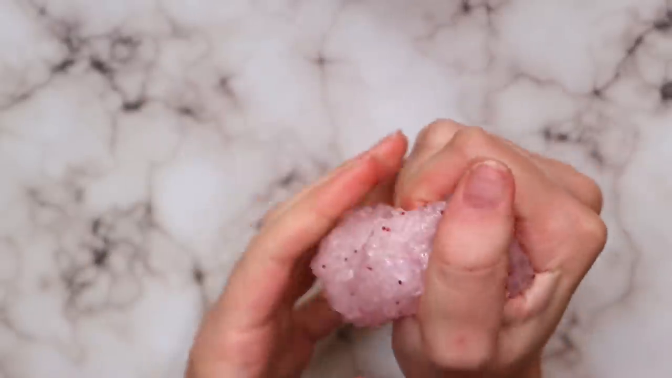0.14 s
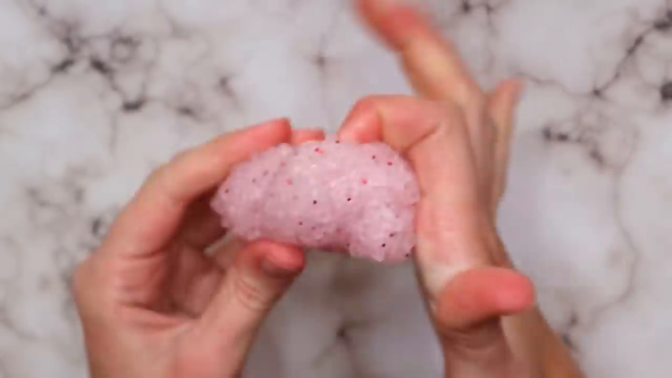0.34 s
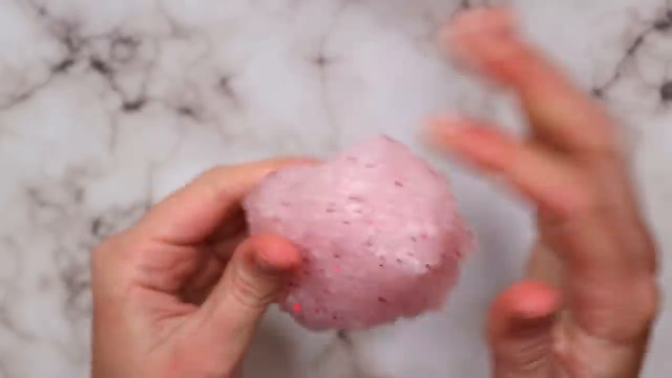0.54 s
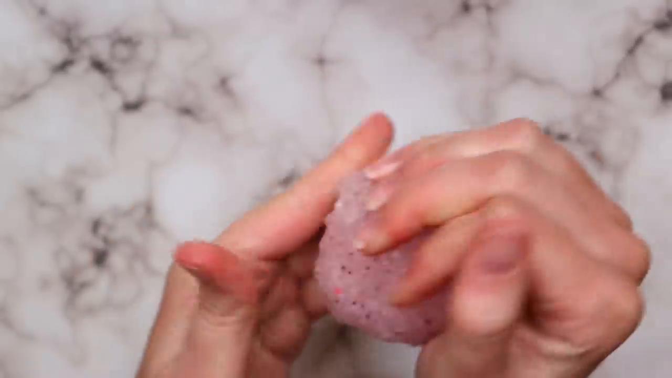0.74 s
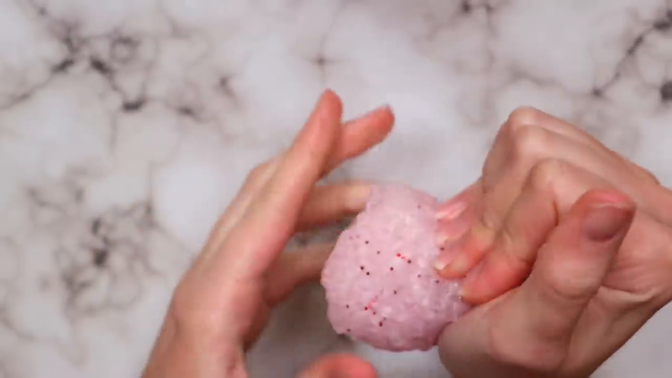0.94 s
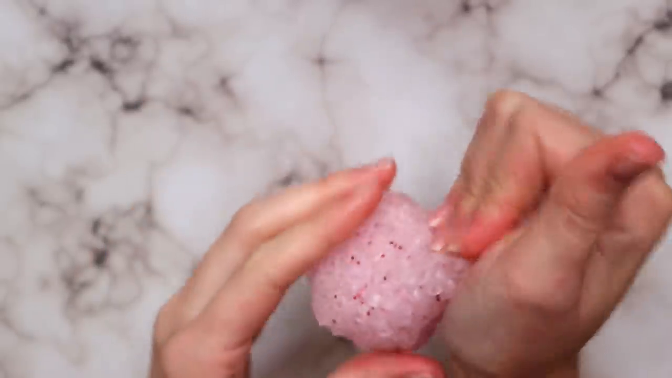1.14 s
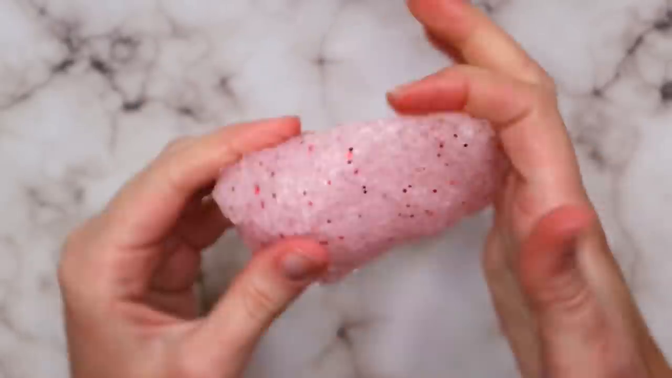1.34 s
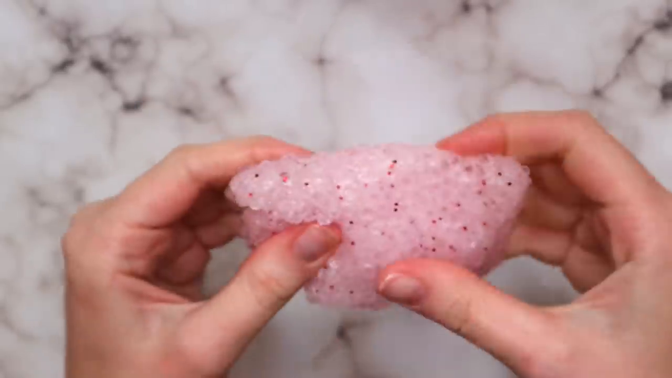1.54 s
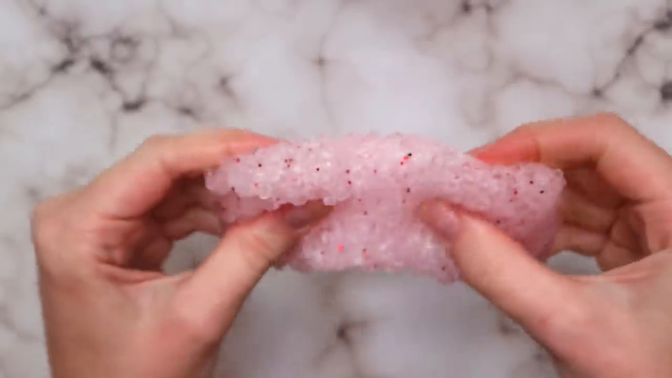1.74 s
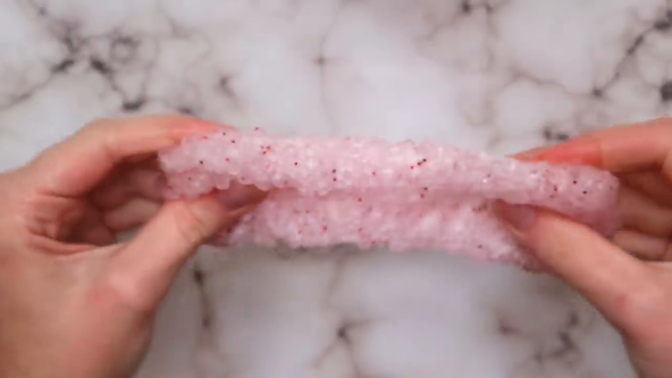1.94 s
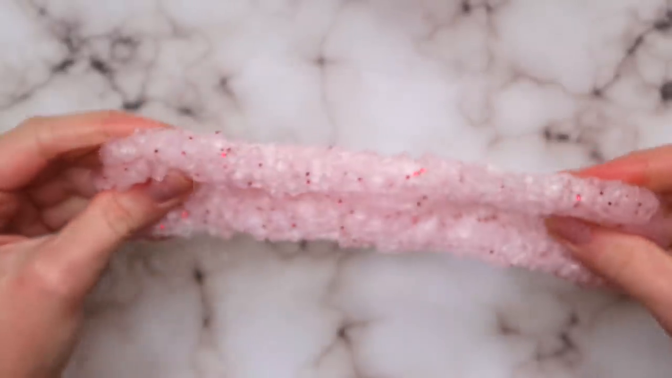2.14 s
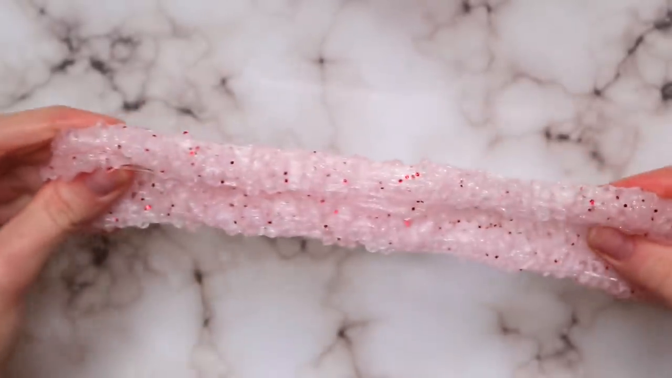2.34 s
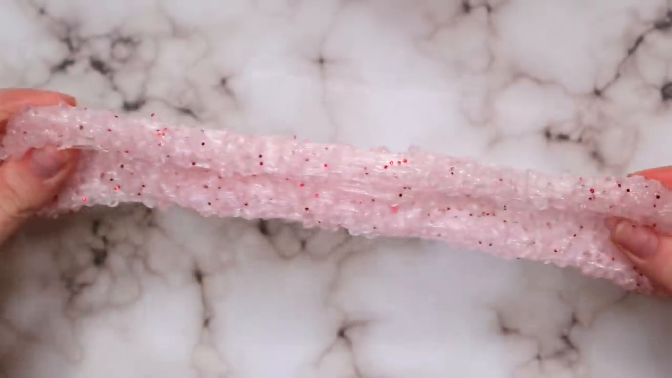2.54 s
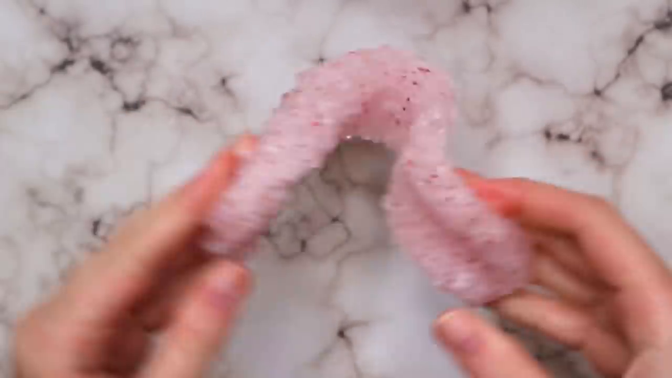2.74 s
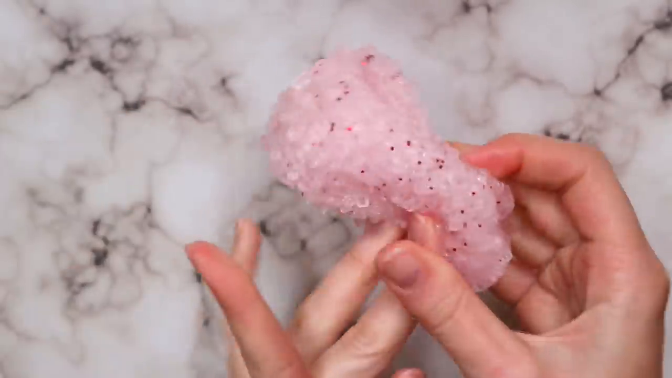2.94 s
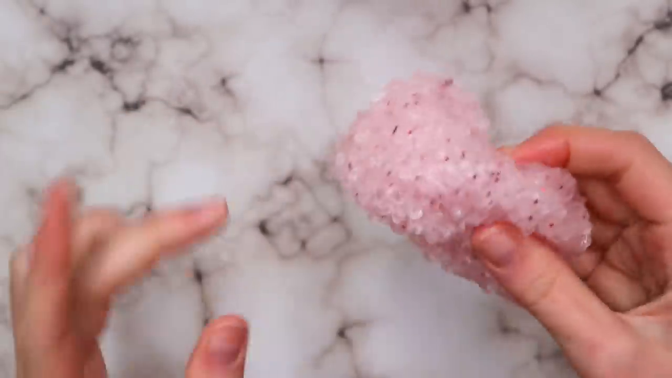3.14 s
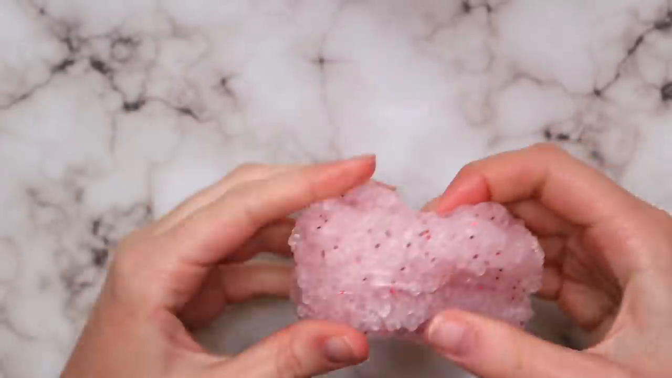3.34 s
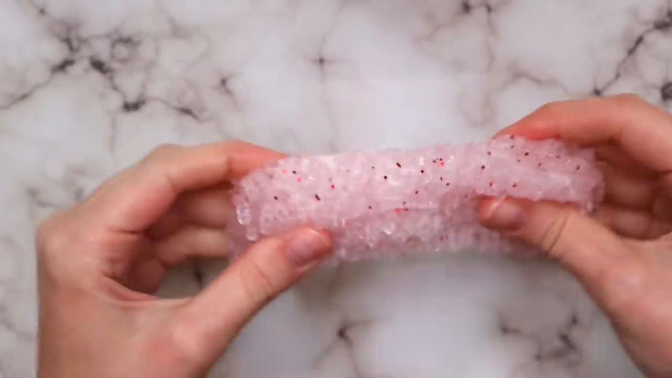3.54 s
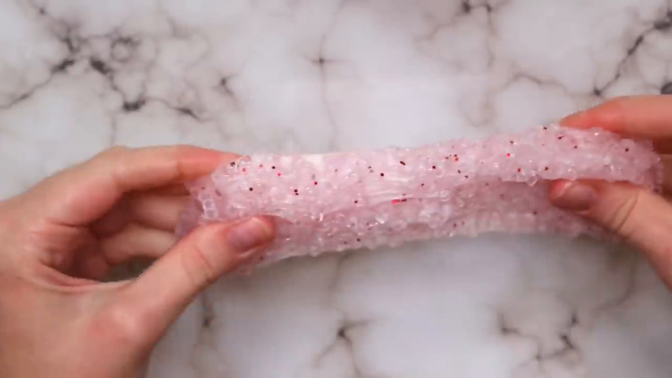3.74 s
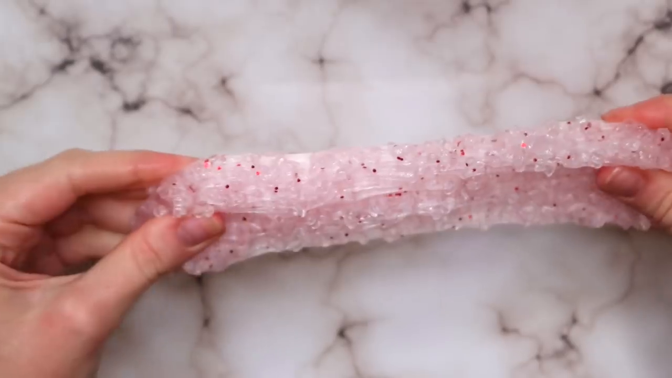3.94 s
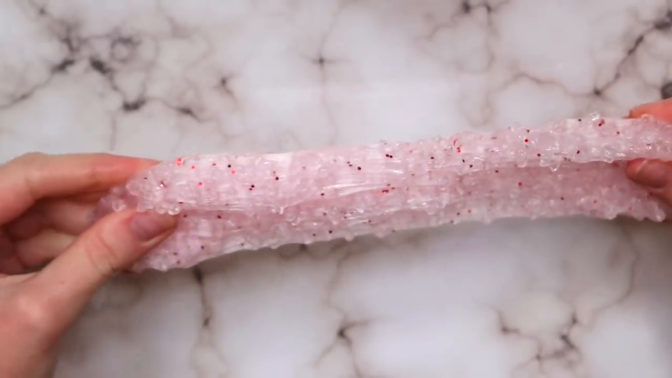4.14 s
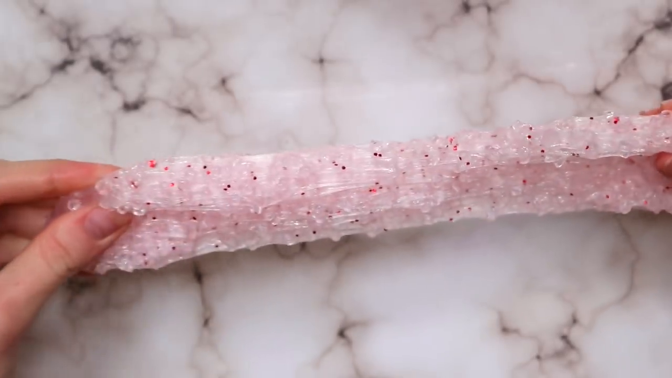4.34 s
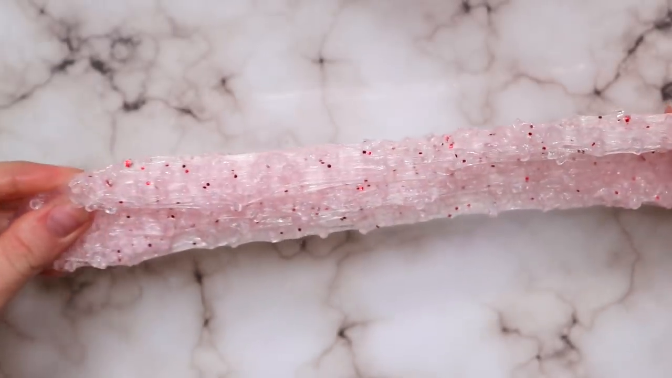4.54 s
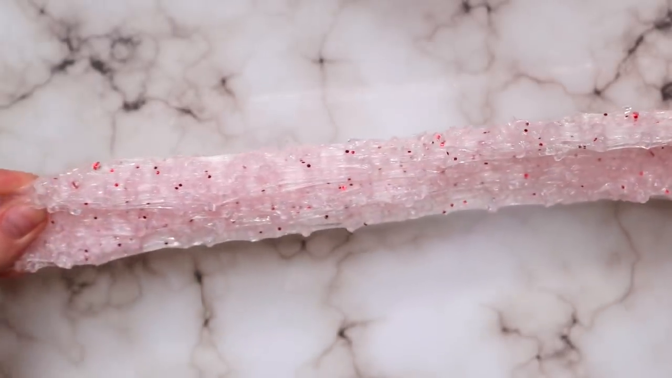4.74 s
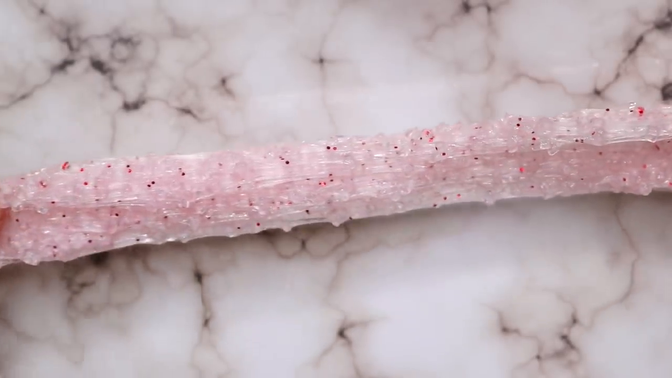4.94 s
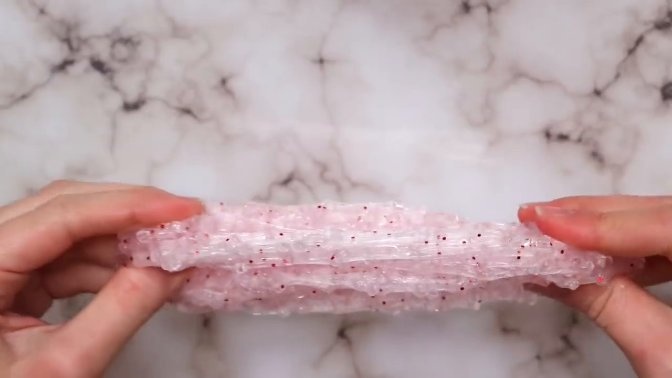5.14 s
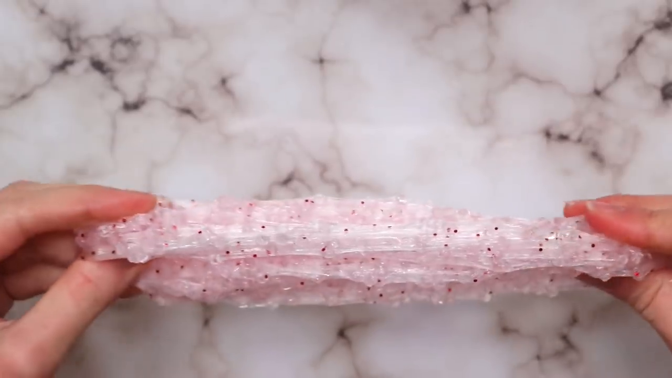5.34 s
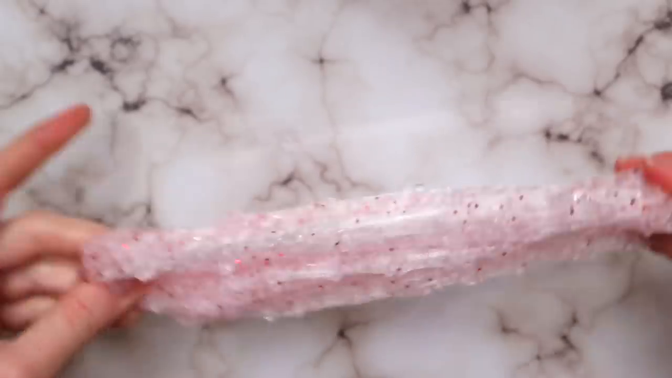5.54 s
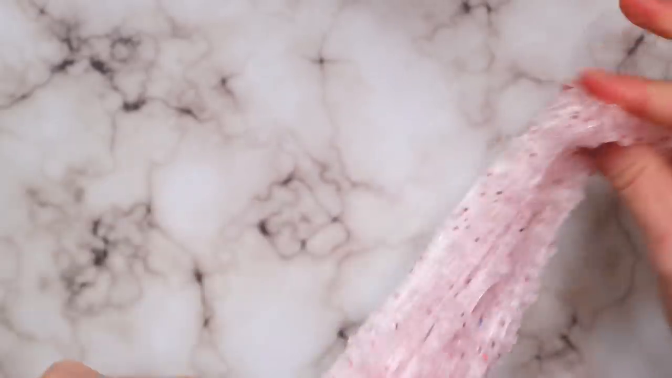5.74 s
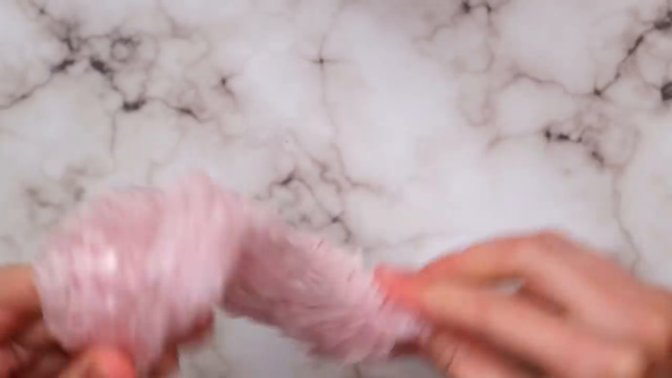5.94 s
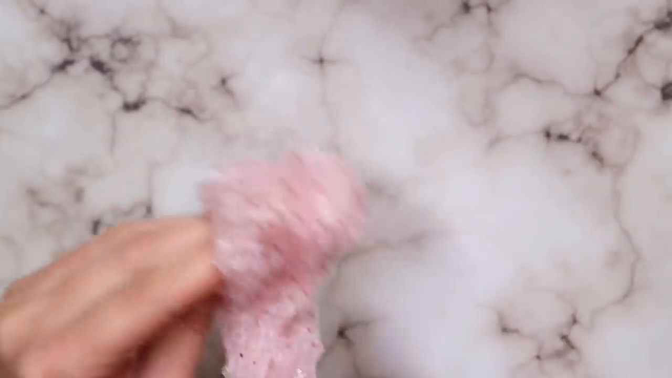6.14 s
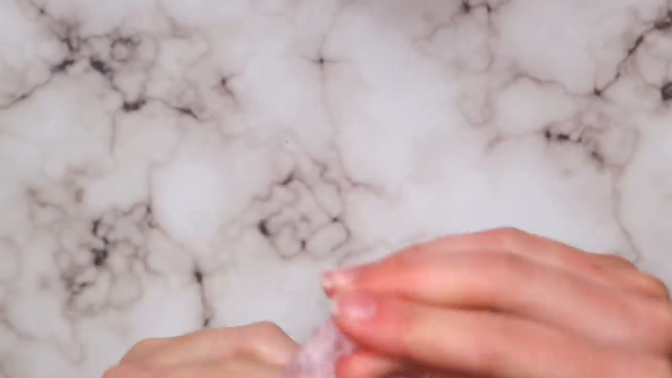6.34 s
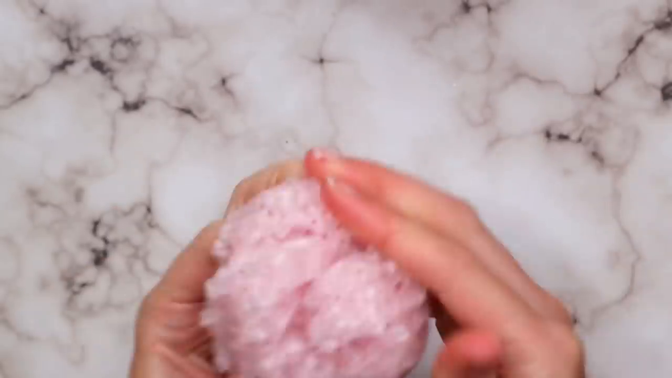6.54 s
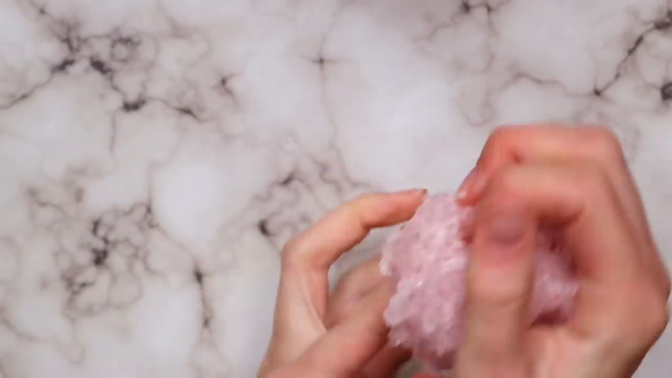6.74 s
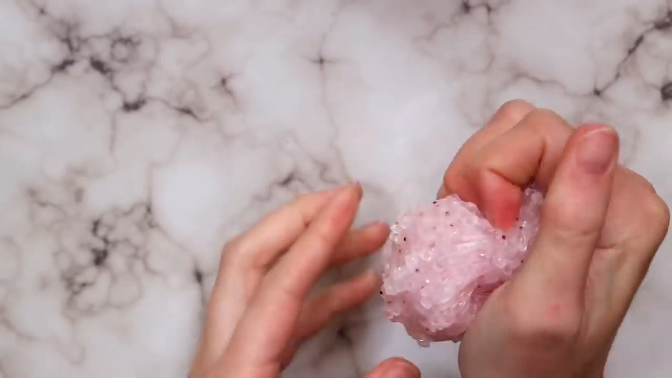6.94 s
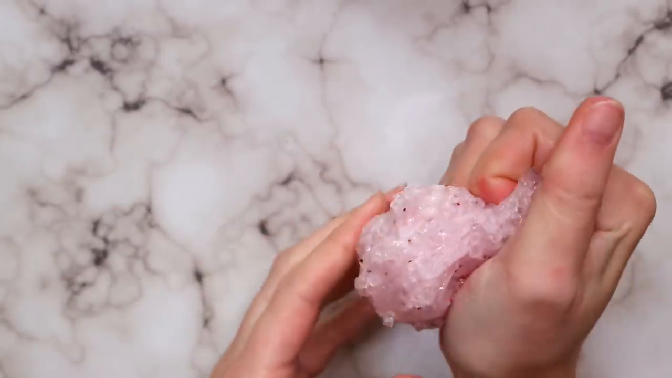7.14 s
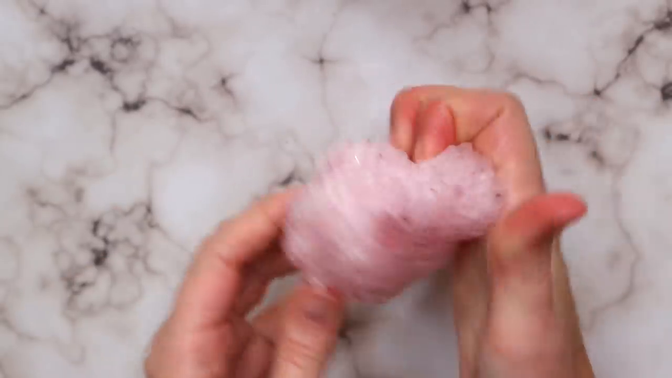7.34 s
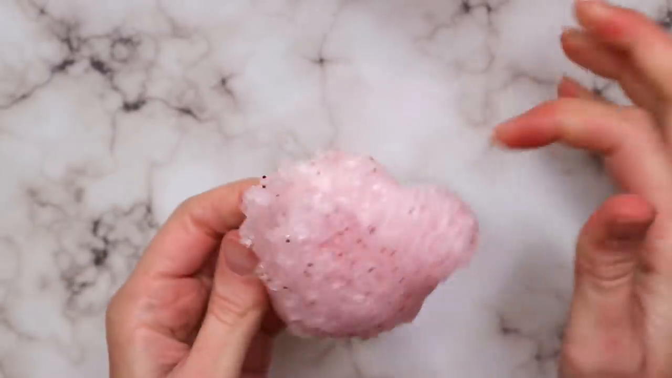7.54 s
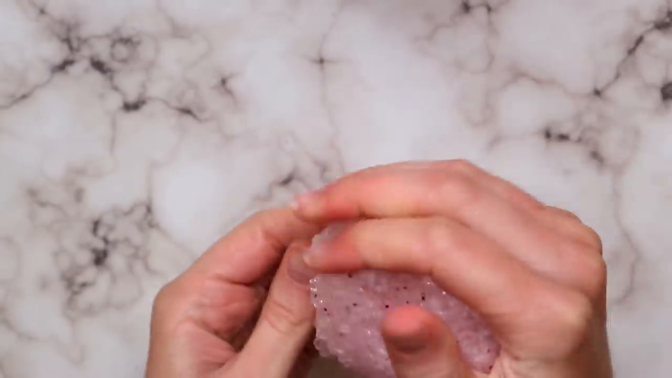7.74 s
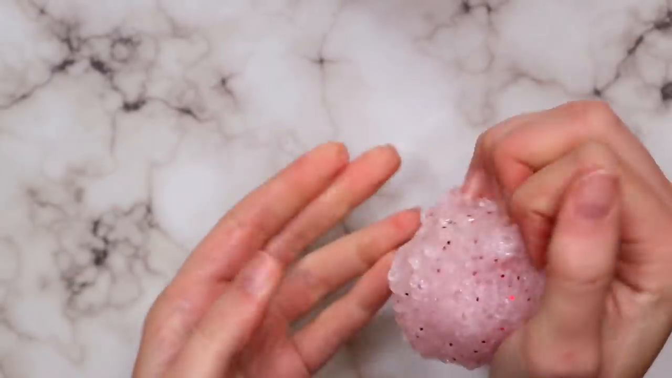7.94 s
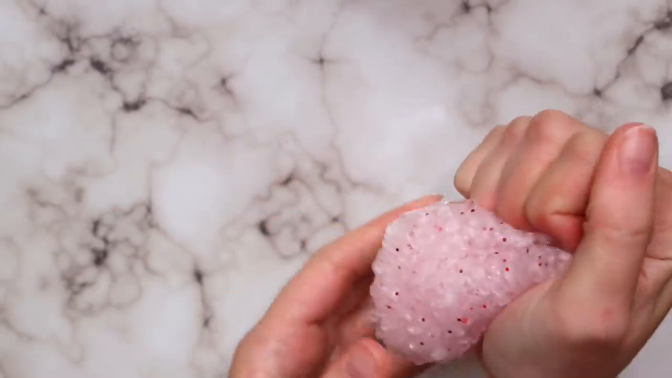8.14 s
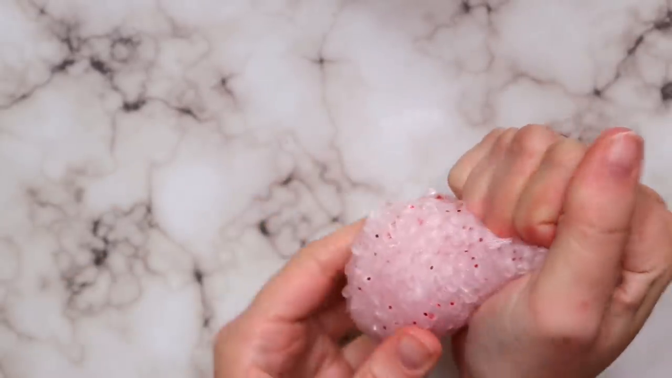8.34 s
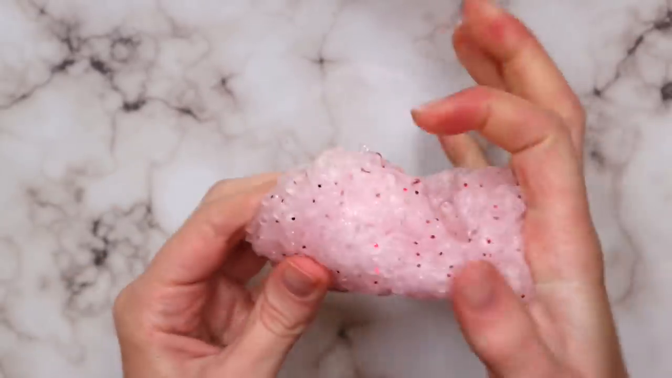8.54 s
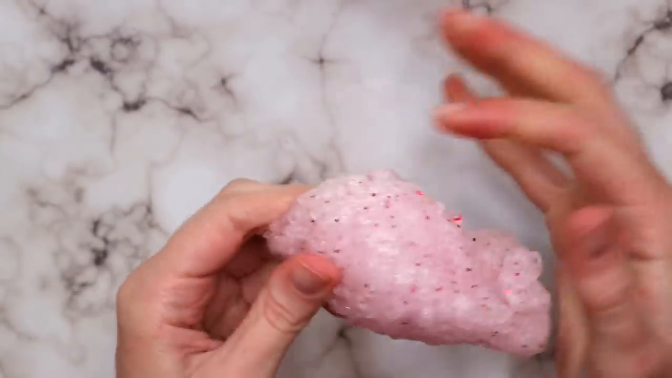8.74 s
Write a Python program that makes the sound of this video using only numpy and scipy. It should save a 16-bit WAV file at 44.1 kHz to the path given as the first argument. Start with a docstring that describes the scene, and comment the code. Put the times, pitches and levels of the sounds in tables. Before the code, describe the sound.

Fingers squeeze and poke beaded slime up close, with sharp bright pops and wet crackle, then stretches that fizz softly over a faint room hum.

```python
"""Bubbles pop in a lump of beaded slime kneaded close to a stereo microphone: damped cavity rings, snaps and thuds.
Fingers squelch in and peel out as swells of dense crackle, and the stretched strand fizzes with tiny bursts.
Under it lie a faint room tone of coloured noise with hum partials and, for a while,
a low drone like an engine outside, made of a few harmonics and rumble."""
import sys
import numpy as np
from scipy import signal
from scipy.fft import rfft, irfft, next_fast_len
from scipy.io import wavfile
from scipy.ndimage import uniform_filter1d, minimum_filter1d, map_coordinates

SR = 44100
rng = np.random.default_rng(int(sys.argv[2]) if len(sys.argv) > 2 else 0)


def unload_wav(signal):
    """Save mono or channel-first audio to the path in sys.argv[1] as 16-bit WAV at rate SR, clipped to [-1, 1]."""
    wavfile.write(
        sys.argv[1],
        SR,
        np.round(np.clip(np.atleast_2d(signal).T, -1, 1) * 32767).astype(np.int16),
    )


N = 392049


def amp(db):
    """Decibels to gain."""
    return 10 ** (np.asarray(db) / 20)


def unit(x):
    """Scaled to rms 1."""
    return x / np.sqrt(np.mean(x ** 2) + 1e-20)


def unit_energy(x):
    """Scaled to energy 1 in each channel."""
    return x / np.sqrt(np.sum(x ** 2, axis=-1, keepdims=True) + 1e-20)


def along(points, hz):
    """(Hz, value) points read on a log frequency axis."""
    point_hz, value = np.transpose(points)
    return np.interp(np.log(hz + 1), np.log(point_hz + 1), value)


def wobble(rate):
    """A smooth random curve, rate knots a second."""
    knots = rng.standard_normal(int(N * rate / SR) + 4)
    return map_coordinates(knots, [np.arange(N) * rate / SR])


def impulse(spectrum, size=1024):
    """Minimum-phase click: the most compact causal burst with this spectrum, energy 1."""
    cepstrum = irfft(np.log(amp(along(spectrum, np.fft.rfftfreq(size, 1 / SR)))))
    # folding the cepstrum forward in time makes the click causal
    cepstrum[1:size // 2] *= 2
    cepstrum[size // 2 + 1:] = 0
    return unit_energy(irfft(np.exp(rfft(cepstrum))))


def convolve(x, response):
    """Convolution along time; mono spreads to both channels."""
    return signal.fftconvolve(np.atleast_2d(x), np.atleast_2d(response), axes=1)


def noise(spectrum, side_db):
    """Coloured stereo noise of rms 1; side_db sets its width."""
    m = next_fast_len(N)
    gain = amp(along(spectrum, np.fft.rfftfreq(m, 1 / SR)))
    mid, side = irfft(rfft(rng.standard_normal((2, m))) * gain, m)[:, :N]
    side = amp(side_db) * side
    return unit(np.array([mid + side, mid - side]))


# how long the room rings at each frequency: pitch_hz [Hz], t60_s [s]
ROOM_DECAY = [(200, 0.35), (800, 0.36), (2500, 0.31), (7000, 0.36), (15000, 0.22)]


def room_tail(size=SR // 4):
    """The room's answer to a click, energy 1; each frequency dies at its own speed."""
    hz, frame_s, grains = signal.stft(rng.standard_normal((2, size)), SR, nperseg=256)
    decay = amp(-60 * frame_s / along(ROOM_DECAY, hz)[:, None])
    tail = signal.istft(grains * decay, SR, nperseg=256)[1][:, :size]
    return unit_energy(tail * (np.arange(size) > .006 * SR))


# echo of the table top just under the hands: nominal delay, and the random spread given to every echo delay
TABLE_ECHO_S, ECHO_SPREAD = .00093, 0.036  # seconds, fraction of the delay
# echoes of nearby walls: delay_s [s, nominal], level_db [dB re direct sound]
WALL_ECHOES = [(.0082, -16.5), (0.0137, -20.5), (0.0206, -19)]


def surroundings(near_db, room_db, near_t60=0.027, apart=1.0, table_db=-8):
    """Path to the microphones: direct sound, scatter off the hands, table and wall echoes, then the room's tail."""
    size = SR // 4
    t = np.arange(size) / SR
    scatter = rng.standard_normal((2, size)) * amp(-60 * t / near_t60) * (t > .0002)
    near = amp(near_db) * unit_energy(scatter) * [[1], [apart]]
    mid, side = near + amp(room_db) * room_tail(size)
    # long waves reach both capsules alike
    side = signal.lfilter(*signal.butter(1, 1200, "high", fs=SR), side)
    mid[0] += 1  # direct sound
    for delay_s, db in [(TABLE_ECHO_S, table_db)] + WALL_ECHOES:
        varied_s = delay_s * (1 + ECHO_SPREAD * rng.standard_normal())
        mid[round(varied_s * SR)] += amp(db)
    return unit_energy(np.array([mid + side, mid - side]))


BURST_OCTAVES = .55  # bandwidth of each bubble-size group


def crackle(level, spectrum, low_hz, high_hz, per_second, spread_db, room_db, count=6):
    """Countless tiny bursts, mostly weak, a few strong; each bubble-size group has its own pitch, spot and echoes."""
    f = np.fft.rfftfreq(1024, 1 / SR) + 1
    centres_hz = np.geomspace(low_hz, high_hz, count)[:, None]
    octaves = np.log2(np.clip(f, low_hz, high_hz) / centres_hz)
    shares = (1 + (octaves / BURST_OCTAVES) ** 2) ** -2
    # together the groups add up to the given spectrum
    powers = amp(along(spectrum, f)) ** 2 * shares / shares.sum(axis=0)
    out = np.zeros((2, N))
    for power in powers / powers.mean(axis=1).sum():
        at = rng.integers(N, size=int(per_second / count * N / SR))
        strength = np.minimum(rng.exponential(size=len(at)), 3.8)
        signs = rng.choice([-1, 1], len(at))
        bursts = unit(np.bincount(at, amp(spread_db * strength) * signs, N))
        click_spectrum = np.column_stack([f, 10 * np.log10(power + 1e-12)])
        click = np.sqrt(power.mean()) * impulse(click_spectrum)
        path = convolve(click, surroundings(-9, room_db, table_db=-16))
        out += convolve(level * bursts, path)[:, :N]
    return out


def resonance(f, hz, q, skirt=1.89):
    """Power response of a damped resonance, mean 1; skirt sets how steeply it falls to either side."""
    power = (1 + (q * (f / hz - hz / f)) ** 2 / skirt) ** -skirt
    return power / power.mean()


# the tearing film and the wet mass behind it, both heavily damped
SNAP_HZ, THUD_HZ, SKIN_Q = 2650, 730, 0.77


def bubble(hz, q, snap_db, thud_db):
    """One burst: the opened cavity rings for a few cycles over the snap of its film and a wet thud."""
    f = np.fft.rfftfreq(1024, 1 / SR) + 1
    ring = resonance(f, hz, q)
    snap = amp(snap_db) ** 2 * resonance(f, SNAP_HZ, SKIN_Q)
    thud = amp(thud_db) ** 2 * resonance(f, THUD_HZ, SKIN_Q)
    power = ring + snap + thud
    return np.sqrt(power.mean()) * impulse(np.column_stack([f, 10 * np.log10(power + 1e-5)]))


def ticks(level, per_second, size_db, spread_db=3, pitch_hz=7200, pitch_spread=0.46, q=3.0):
    """Single small bubbles, each with its own size and pitch, whose loudness follows the handling around them."""
    count = int(per_second * N / SR)
    out = np.zeros((2, N + SR))
    paths = [surroundings(near_db=-6, room_db=-11) for _ in range(8)]
    for k, (when, size, pitch) in enumerate(rng.standard_normal((count, 3))):
        start = int((k + when) / count * N) % N
        hz = np.clip(pitch_hz * np.exp(pitch_spread * pitch), 1200, 13000)
        if level[start] > 0:
            heard = convolve(bubble(hz, q, snap_db=-16, thud_db=-13), paths[k % len(paths)])
            gain = level[start] * amp(size_db + spread_db * min(size, 2))
            out[:, start:start + heard.shape[1]] += gain * heard
    return out[:, :N]


# colour of air and microphone hiss: pitch_hz [Hz], level_db [relative dB per Hz]
AIR_COLOUR = [(12, -40), (20, 0.5), (130, -4), (285, -6), (367, -2), (574, -8.5), (718, -7), (1480, -8),
              (3840, -16.5), (4300, -23), (5080, -21.5), (7730, -16.5), (8890, -20), (12100, -18),
              (16000, -29)]
# partials of the appliance hum: pitch_hz [Hz], level_db [dB rms, before its wobble]
HUM_PARTIALS = [(90, -73.5), (120, -67), (243, -77), (362, -73)]


def room_tone(air_db=-54.0):
    """Still air and microphone hiss as coloured noise, with a slightly unsteady appliance hum of sine partials."""
    t = np.arange(N) / SR
    hum = np.zeros(N)
    for hz, db in HUM_PARTIALS:
        phase = 2 * np.pi * hz * t + .8 * wobble(7)
        hum += amp(db + 1.5 * wobble(4)) * np.sin(phase)
    return np.sqrt(2) * hum + amp(air_db) * noise(AIR_COLOUR, side_db=-1.5)


ENGINE_ON_S, ENGINE_OFF_S, ENGINE_EDGE_S = 2.66, 5.05, 0.037  # middle of each fade, and its length
ENGINE_TONE_DB, ENGINE_RUMBLE_DB = -48.5, -55.5
BOOM_ENDS_S, BOOM_FADE_DB_PER_S = 4.42, 13  # late on its lowest order fades
RUMBLE_FULL_S, RUMBLE_GROWS_DB_PER_S = 3.8, 5.5  # early on its rumble builds
# speed of the distant engine, before a small wobble: time_s [s], pitch_hz [Hz]
ENGINE_SPEED = [(2.7, 105.3), (3.34, 113.5), (3.48, 111.6), (3.8, 109), (4.51, 109.3), (4.9, 105)]
# harmonics of the engine: multiple [x pitch], level_db [dB re engine tone], loudest_s [s],
# fall_db_per_s [dB per s, before and after the loudest moment]
ENGINE_HARMONICS = [(1, -3.8, 3.7, 2), (2, -21.5, 4.3, 4), (3, -13.5, 4.86, 4.5), (4, -9, 3.55, 75)]
# colour of the engine's rumble: pitch_hz [Hz], level_db [relative dB per Hz]
RUMBLE_COLOUR = [(20, -31), (33, -6.5), (43, -2), (65, -23), (100, -19), (160, -18.5), (350, -15.5),
                 (500, -18), (800, -24.5), (2000, -85)]


def engine():
    """A far engine drifts in speed; only its low orders and rumble come through the walls."""
    t = np.arange(N) / SR
    hz = np.interp(t, *np.transpose(ENGINE_SPEED))
    inside_s = np.minimum(t - ENGINE_ON_S, ENGINE_OFF_S - t)
    running = np.clip(inside_s / ENGINE_EDGE_S + .5, 0, 1)
    boom_db = -BOOM_FADE_DB_PER_S * np.maximum(t - BOOM_ENDS_S, 0)
    rumble_db = ENGINE_RUMBLE_DB - RUMBLE_GROWS_DB_PER_S * np.maximum(RUMBLE_FULL_S - t, 0)
    phase = 2 * np.pi * np.cumsum(hz * (1 + 0.0023 * wobble(14))) / SR
    tone = np.zeros(N)
    for multiple, db, loudest_s, fall in ENGINE_HARMONICS:
        level_db = db - fall * np.abs(t - loudest_s) + 1.3 * wobble(11)
        if multiple == 1:
            level_db = level_db + boom_db
        tone += amp(level_db) * np.sin(multiple * phase)
    rumble = amp(rumble_db) * noise(RUMBLE_COLOUR, side_db=-12.0)
    return running * (np.sqrt(2) * amp(ENGINE_TONE_DB) * tone + rumble)


SLACK_DB_PER_S = 85  # extra fade once the strand hangs slack
# the lump pulled into a strand: taut_s [s], slack_s [s], level_db [dB when taut, before each layer's trim],
# tighten_db_per_s [dB per s], relax_db_per_s [dB per s]
STRAND_PULLS = [(2.012, 2.52, -47, 35, 13), (3.587, 4.993, -50.5, 86, 4.5), (5.07, 5.56, -50.5, 144, 4.5),
                (6.193, 6.686, -54, 32, 4)]


def tension():
    """Level of the fizz in dB: each pull tightens, relaxes slowly while it is held, then goes slack."""
    t = np.arange(N) / SR
    pulls = []
    for taut_s, slack_s, db, tighten, relax in STRAND_PULLS:
        rising = tighten * np.maximum(taut_s - t, 0)
        relaxing = relax * np.maximum(t - taut_s, 0)
        slackening = SLACK_DB_PER_S * np.maximum(t - slack_s, 0)
        pulls.append(db - rising - relaxing - slackening)
    return np.max(pulls, axis=0)


# colour of the coarse fizz: pitch_hz [Hz], level_db [relative dB per Hz]
COARSE_FIZZ_COLOUR = [(100, -9.5), (330, -3), (700, -14), (1300, 1.5), (1650, -1.5), (2200, -0.5),
                      (3200, 1), (4800, -12), (9000, -52.5)]
# colour of the fine fizz: pitch_hz [Hz], level_db [relative dB per Hz]
FINE_FIZZ_COLOUR = [(2500, -12.5), (5000, -10), (7300, -6.5), (10500, -9.5), (15500, -19.5)]


def stretching(low_db=-4.5, fine_db=-3):
    """Pulled into a strand, the slime fizzes in fits as microscopic bubbles tear; now and then a larger one ticks."""
    pull_db = tension() + 1.3 * wobble(22)
    coarse = crackle(amp(pull_db + low_db), COARSE_FIZZ_COLOUR, 900, 3400,
                     per_second=1100, spread_db=5.8, room_db=-5, count=4)
    fine = crackle(amp(pull_db + fine_db), FINE_FIZZ_COLOUR, 5000, 12000,
                   per_second=1400, spread_db=6, room_db=-1, count=3)
    return coarse + fine + ticks(amp(pull_db) * (pull_db > -75), per_second=45, size_db=18)


LET_GO_S, LET_GO_PER_RISE = 0.028, 0.23  # a squelch dies away in this time, plus a share of its rise
# fingers pressing in or peeling out: peak_s [s], level_db [dB, before the layer trims],
# rise_s [s], hold_s [s], body_db [dB re the swell, before the pocket trim]
FINGER_SQUELCHES = [(.005, -34, 0.023, 0, -0.5), (.13, -50, 0.18, 0.0029, 4.5),
                    (0.282, -33, 0.012, 0.045, -0.5), (0.436, -44, 0.011, 0.03, -4),
                    (.77, -45, 0.021, 0, 4.5), (.88, -48.5, 0.012, 0.003, 3.5),
                    (.965, -41.5, .003, 0.013, 1), (1.278, -29, 0.01, 0.022, 0),
                    (1.827, -55, 0.044, 0.053, 9), (2.715, -54.5, 0.069, 0.011, 7.5),
                    (2.899, -46, 0.013, 0, 4), (2.99, -52, 0.0092, 0.0071, 10),
                    (3.051, -50, 0.0051, 0.0016, 6), (3.098, -51.5, 0.0086, 0, 8.5),
                    (3.33, -56, 0.039, 0.015, -8), (5.06, -49.5, 0.0055, 0, -12),
                    (5.79, -48.5, 0.017, 0, -1), (6.08, -48.5, 0.048, 0, -5), (6.477, -45, 0.03, 0.034, -9),
                    (6.785, -46, 0.021, 0.0043, -12), (7.06, -38.5, 0.069, 0, -3),
                    (7.10, -41.5, 0.011, 0.035, 4.5), (7.363, -30, 0.024, 0.023, -1),
                    (7.498, -45, 0.016, 0.042, 1.5), (7.839, -49, 0.011, 0.0052, -14),
                    (8.1, -42.5, 0.045, 0, -6), (8.177, -43, .01, 0.034, -15),
                    (8.218, -41, 0.01, 0.014, 0.5), (8.477, -34, 0.018, 0, -0.5),
                    (8.501, -34.5, 0.024, 0.032, -2), (8.659, -47.5, 0.029, 0, 4.5)]
# colour of the sticking skin: pitch_hz [Hz], level_db [relative dB per Hz]
FILM_COLOUR = [(60, -67.5), (200, -32), (900, -10.5), (1850, -6), (2300, -1), (3100, 1), (4200, -1.5),
               (5200, -1), (7400, 3), (11000, 0), (15500, -10)]
# colour of the deep pockets: pitch_hz [Hz], level_db [relative dB per Hz]
POCKET_COLOUR = [(50, -54), (150, -26), (260, -5), (450, 0.5), (720, -1), (950, -5), (1350, 1.5),
                 (1700, -11.5), (4000, -18.5)]


def squelches(film_db=-1, pocket_db=-9):
    """Skin sticks and tears free in a swell of dense crackle; deep pokes open larger, lower pockets."""
    t = np.arange(N) / SR
    film_power, pocket_power = np.zeros(N), np.zeros(N)
    for peak_s, db, rise_s, hold_s, body_db in FINGER_SQUELCHES:
        fall_s = LET_GO_S + LET_GO_PER_RISE * rise_s
        distance = np.maximum((peak_s - t) / rise_s, (t - peak_s - hold_s) / fall_s)
        swell = amp(db) * np.exp(-np.clip(distance, 0, 20))
        film_power += swell ** 2
        pocket_power += (swell * amp(body_db)) ** 2
    film = crackle(amp(film_db) * np.sqrt(film_power), FILM_COLOUR, 2000, 12000,
                   per_second=4500, spread_db=5.3, room_db=-6)
    pockets = crackle(amp(pocket_db) * np.sqrt(pocket_power), POCKET_COLOUR, 350, 1400,
                      per_second=2400, spread_db=3.5, room_db=-6, count=3)
    # loose bubbles also burst just before and after each squeeze
    smoothed = uniform_filter1d(np.minimum(film_power, amp(-44) ** 2), size=8000)
    handling = np.sqrt(np.abs(smoothed))
    return film + pockets + ticks(handling * (handling > amp(-65)), per_second=40, size_db=17)


TEAR_STEP_S = 0.00037  # typical time between jerks; each film takes half to one and a half of it
TEAR_FIRST = .86  # strength of the first jerk


def tear(burst):
    """The film gives way with a hard first jerk and a few weaker ones; an all-pass, so the colour stays."""
    step = max(1, round(TEAR_STEP_S * (.5 + rng.random()) * SR))
    jerks = np.r_[TEAR_FIRST, np.zeros(step - 1), 1]
    return signal.lfilter(jerks, jerks[::-1], burst)


# the larger bubbles bursting: start_s [s], level_db [dB, energy of the ring], pitch_hz [Hz, cavity],
# q [sharpness of the ring], snap_db [dB re ring], thud_db [dB re ring], pan_db [dB, left over right]
BUBBLE_POPS = [(0.0893, -20.5, 7640, 2.6, -25, -17, -4), (0.1145, -13, 8800, 1.4, -36, -11.5, -3),
               (0.1178, -15, 10000, 1.5, -20, -25, -2), (0.1449, -8, 8140, 2.3, -4.5, -33, 0),
               (0.1818, -19.5, 3100, 1.5, 1, -5, 0), (0.2416, -19.5, 4550, 1.4, -27, -4, 1),
               (0.2614, -20, 8120, 1.8, -17, -19, 0), (0.303, -5.5, 9700, 1.1, -31, -39, -2),
               (0.515, -13, 8700, 1.9, -29, -12.5, 3), (0.5458, -22, 7670, 1.2, -5, -9, -3.5),
               (0.632, -20.5, 10000, 1.2, -25, -23, -6), (0.776, -17.5, 7870, 3.3, 1.5, -6.5, -1),
               (0.8307, -19.5, 6700, 3.2, -32, -36, -5), (0.8492, -27, 7420, 3.8, -19, -21, 7),
               (0.9052, -17, 11960, 1.9, -24, -20, -1.5), (0.9591, 6.5, 3100, 6, -12, -20, 0),
               (0.9591, 7.5, 4160, 3.7, -20, -24, 0), (0.9675, -7, 11000, 1.2, -21, -30, -1),
               (1.2817, -1, 9000, 1.7, -17, -45, -2), (1.476, -17, 9500, 2.3, -7.5, -20, -2),
               (1.6654, -27.5, 1480, 3, -7, -18, 0), (1.68, -30, 2200, 5, -15, -20, -4),
               (1.7302, -19.5, 9700, 2.3, -23, -37, -3), (1.9383, -20.5, 7450, 2.8, -15, -36, -1),
               (2, -5, 11500, 3.2, -17.5, -43, 1.5), (2.0407, -17.5, 1760, 3.1, 1.5, -36, -2),
               (2.1101, -21.5, 4020, 1.1, -22, -20, 2), (2.1296, -22, 10630, 0.8, -13, -38, -4),
               (2.193, -17, 10990, 1.9, -32, -27, 1), (2.2297, -21.5, 7560, 1.9, -5, -34, 0),
               (2.33, -23, 7330, 4.1, -7, -38, -1), (2.3364, -19.5, 5800, 2.4, -32, -20, -2),
               (2.3693, -23, 11680, 3.0, -2, -20, -8), (2.7034, -24, 8500, 3.3, -18, -15, 3),
               (2.811, -22, 8100, 1.9, -30, -15, -4), (2.8985, -24.5, 8200, 3.1, -30, -12, -1.5),
               (2.9202, -31.5, 5950, 3.5, 7, -17, -8), (2.9867, -25.5, 7840, 5.9, -3, -7, -2),
               (2.999, -24.5, 6270, 1.8, -10, -33, -3), (3.0487, -19.5, 7100, 1.3, -9, -35, -1.5),
               (3.057, -22, 5480, 6, -17, -14, -3), (3.082, -22, 2140, 8, -22, -25, -2),
               (3.091, -21, 1410, 9, -9, -30, -2), (3.103, -22, 7650, 2.2, -3, -18, -3),
               (3.5322, -25.5, 8300, 1.5, -20, -18, -8), (3.5555, -21.5, 6860, 1.8, -29, -7, -1),
               (3.5995, -27, 8790, 1.1, -31, -15, -4), (3.6277, -19.5, 11760, 2.7, -18, -35, 0),
               (3.6344, -17, 8220, 2.6, -14, -31, -3), (3.655, -20, 7460, 1.5, -14, -37, -2),
               (3.7612, -10, 9700, 2.8, -7.5, -42, -1), (4.1455, -18, 6020, 1.5, -2.5, -21, -1),
               (4.33, -22, 13360, 0.71, -21, -24, -6), (4.4392, -24, 9300, 5.3, -27, -37, 1.5),
               (4.506, -27.5, 8600, 2.5, -3, -38, 3), (4.671, -23, 8000, 2.5, -33, -33, -3.5),
               (5.1277, -24.5, 2500, 3, -6, -20, -2), (5.0493, -21, 11610, 2, -2.5, -38, -6),
               (5.143, -12, 8500, 1.8, -16, -31, -4), (5.435, -3, 9400, 2.1, -12.5, -23.5, 0),
               (5.504, -21.5, 6770, 2.5, -15, -8, -4), (5.5127, -21.5, 8640, 0.51, -2, -40, -5),
               (5.7087, -18, 8490, 1.6, -7, -14, -2), (5.7243, -6, 9500, 2.1, -12, -23, -4.5),
               (5.797, -20.5, 7400, 2.1, -6.5, -22, 5), (5.829, -17.5, 10150, 1.9, -3.5, -26, -3),
               (5.938, -23.5, 6950, 3.5, -8, -38, -3), (6.0768, -25.5, 8780, 1.3, -4, -25, -11),
               (6.1744, -19.5, 8930, 2, -9, -24, -2), (6.1898, -23.5, 9500, 2, -17, -25, -2),
               (6.228, -10.5, 10660, 2.6, -9.5, -36, 0.5), (6.3525, -26, 2400, 0.75, 1.5, -25, -1.5),
               (6.472, -24, 7130, 4.0, -16, -38, -6), (6.483, -25, 1960, 4, -5, -20, -1),
               (6.5293, -23, 2900, 5, -12, -20, -1), (6.577, -20.5, 7940, 1.8, -4.5, -14, 0),
               (6.664, -23, 4040, 5, -8, -25, -4), (6.76, -13, 3020, 5, -25, -35, -1),
               (6.762, -13.5, 5800, 3, -25, -35, -3.5), (6.8492, -21.5, 3600, 3.5, 0.5, -6, 0),
               (6.9, -15, 9880, 0.6, -24, -21.5, 2), (6.9205, -9.5, 9900, 2.1, -6, -18, 0.5),
               (6.9295, -1, 8700, 1.8, -9.5, -35, -3.5), (6.943, -11, 12500, 2, -16, -30, -3),
               (6.996, -15.5, 7340, 2.2, -32, -34, 1), (7.0077, -20, 6400, 1.3, -2.5, -12, -3),
               (7.028, 4, 8140, 1.0, -8, -14, -1), (7.048, -0.5, 11100, 2.7, -36, -37, 5),
               (7.0764, 3.5, 3330, 4.9, -28, -2.5, -2), (7.0769, 10.5, 7370, 7, -11, -12.5, -2.5),
               (7.0789, 3, 7600, 12, -14, -13.5, -4), (7.119, -8, 10600, 1.6, -15.5, -22, 4),
               (7.147, 3, 9700, 2.2, -17.5, -22, -0.5), (7.158, -6, 10500, 1.6, -18, -26, -1.5),
               (7.2585, -11.5, 10140, 1.4, -14.5, -48, -2.5), (7.2658, -20, 9890, 2.1, -20, -39, -4),
               (7.3375, 1.5, 8700, 2, -29, -45, 1), (7.3684, -8.5, 6200, 2.8, -6, -8, -1),
               (7.3719, -10.5, 1300, 4, -8, -0.5, 0), (7.3747, -8.5, 3000, 5, -13, -9, 4),
               (7.4533, -16, 9400, 2, -10, -25, -2), (7.4697, -8.5, 7900, 1.3, -19, -44, -2),
               (7.521, -24, 2900, 6, -15, -22, 1), (7.538, -25, 3100, 6, -15, -25, -1),
               (7.5607, -24, 2770, 6, -10, -18, -1), (7.8789, -34, 2000, 4, -10, -20, -5),
               (7.895, -14.5, 8100, 1.6, -5.5, -20, 0), (7.911, -13.5, 2820, 7.2, -4.5, -14, -1),
               (7.946, -10.5, 2900, 5.9, -6.5, -26, -1), (7.959, -19, 4200, 2, -19, -30, -1),
               (7.9805, -23, 3000, 6, -15, -25, -1), (7.9845, -15.5, 7900, 1.7, -17, -27, 0),
               (7.9995, -11, 7120, 1.5, -11, -20, 2), (8.0259, -5, 4170, 1.2, -13, -24, -1),
               (8.0717, -13, 7720, 1.0, -29, -12.5, 0), (8.0926, 1, 8500, 1.3, -15, -39, -1),
               (8.1227, -6, 3760, 0.66, -15, -37, 1), (8.133, -9.5, 3670, 4.0, -31, -39, -5),
               (8.1391, 10, 7500, 3.4, -22, -23.5, 0), (8.1468, -14, 7500, 2, -23, -28, 0),
               (8.2082, -22.5, 1900, 1.5, -3, 2, -1), (8.227, -8.5, 6900, 2.8, -11, -21, 0),
               (8.2305, -8.5, 2970, 3.5, -3, -6.5, -2), (8.2311, -9, 10500, 1.2, -24, -27, -2),
               (8.2891, -13, 8850, 2.5, -7, -51, -2), (8.309, -13.5, 7400, 5, -29, -23, 0),
               (8.3644, -3.5, 9700, 3.3, -21, -42, -2), (8.3771, 3, 7840, 3.1, -12.5, -36, -2.5),
               (8.394, -10, 7860, 1.3, -11, -23, -1), (8.4352, -23.5, 2500, 3, -6, 0, 0),
               (8.4537, -15.5, 10000, 2, -15, -25, -2), (8.4735, -7.5, 6750, 2.0, -14, -14, -2),
               (8.4776, -2.5, 6770, 1.2, -30, -11, -1), (8.5081, -2.5, 8700, 1.7, -8.5, -45, -3),
               (8.575, -12.5, 6800, 7.5, -4.5, -30, -4), (8.6719, -16.5, 8900, 2, -12, -25, -1.5),
               (8.736, -18, 5030, 2.3, -7, -13.5, -2)]


def pops(room_db=-14.0, snap_room_db=-14.5, snap_width=3.1):
    """Each large bubble bursts at its own spot between the hands; the room also answers with a broader, duller ring."""
    out = np.zeros((2, N + SR))
    for start_s, db, hz, q, snap_db, thud_db, pan_db in BUBBLE_POPS:
        burst = tear(bubble(hz, q, snap_db, thud_db))
        path = surroundings(near_db=-3.5, room_db=room_db, near_t60=0.011, table_db=-21)
        heard = convolve(burst, path) * amp([[pan_db / 2], [-pan_db / 2]])
        wide_burst = bubble(hz, max(q / snap_width, .8), snap_db, thud_db)
        heard += amp(snap_room_db) * convolve(wide_burst, room_tail())
        out[:, round(start_s * SR):][:, :heard.shape[1]] += amp(db) * heard
    return out[:, :N]


def scene():
    """Squelches and fizz sit a little to the right, with the pops, over the engine and the room's own sound."""
    slime = (stretching() + squelches()) * amp([[-.6], [.6]])
    return room_tone() + engine() + slime + pops()


TOP_HZ = 16200  # band limit


def record(dry, ceiling=1.6, release_db_per_s=150, clip_top=1.0, hardness=5):
    """A limiter ducks around peaks over the ceiling, tips clip softly, and nothing is kept above the band limit."""
    excess_db = 20 * np.log10(np.maximum(1, np.abs(dry).max(axis=0) / ceiling))
    recovery_db = release_db_per_s * np.arange(N) / SR
    gain = amp(recovery_db - np.maximum.accumulate(excess_db + recovery_db))
    limited = dry * uniform_filter1d(minimum_filter1d(gain, size=25), size=25)
    clipped = limited / (1 + np.abs(limited / clip_top) ** hardness) ** (1 / hardness)
    m = next_fast_len(N + SR // 2)
    kept = np.fft.rfftfreq(m, 1 / SR) < TOP_HZ
    return irfft(rfft(clipped, m) * kept, m)[:, :N]


dry = scene()
out = record(dry)
unload_wav(out)
```